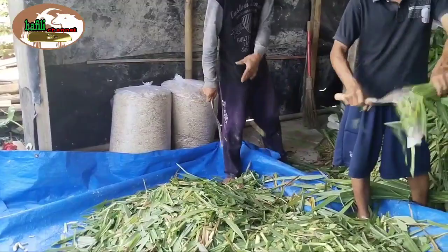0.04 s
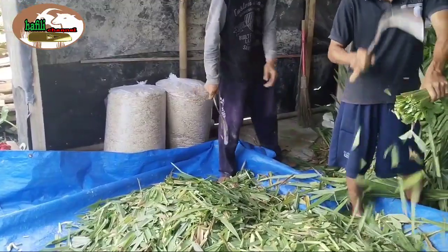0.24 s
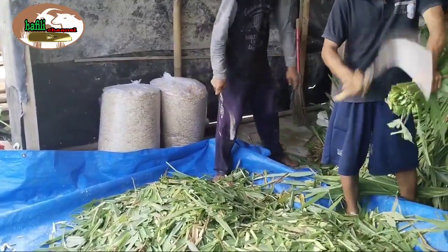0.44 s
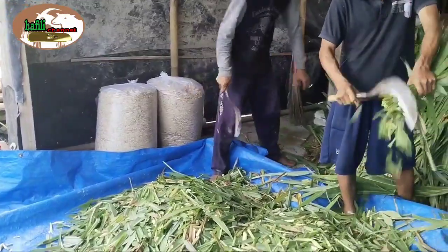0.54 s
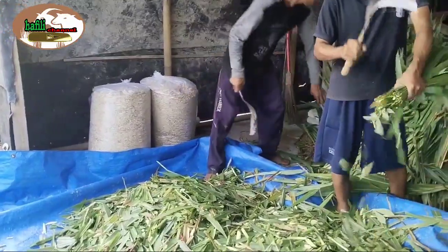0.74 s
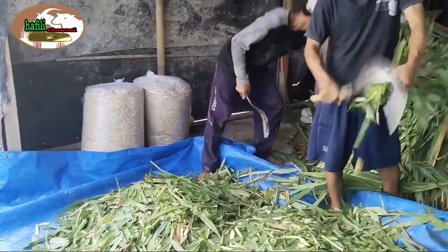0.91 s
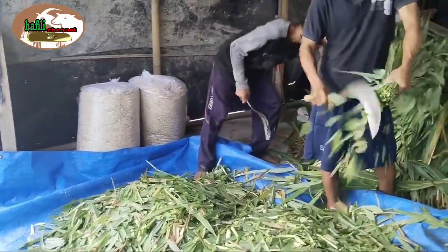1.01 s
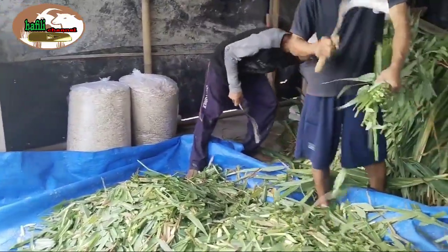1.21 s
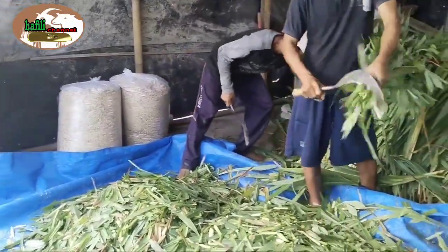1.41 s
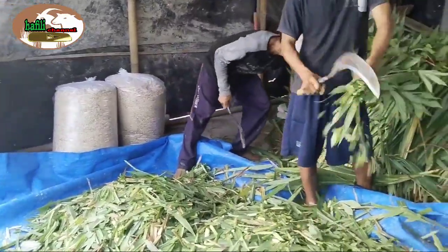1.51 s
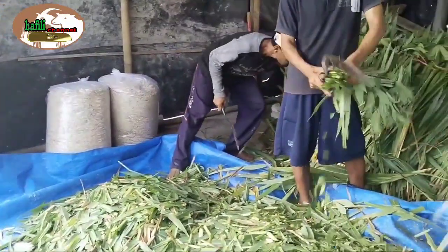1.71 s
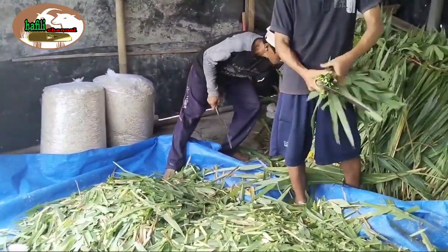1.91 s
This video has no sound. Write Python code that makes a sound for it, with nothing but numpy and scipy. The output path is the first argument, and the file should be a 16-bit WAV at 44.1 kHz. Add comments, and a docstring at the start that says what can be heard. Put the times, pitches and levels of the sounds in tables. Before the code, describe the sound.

A blade chops bundled green stalks four times, each a leafy swish then a crunchy knock.

```python
"""Outdoors, heard from close by: a low hum (filtered noise) and thin insect tones (wavering sines)
lie under a patter of leaves and small rustles made of crackling noise, as cuttings fall onto a heap.
Four strokes then cut the grass stalks. Each is a bright slice through the leaves, then a harder chop through
the stalks, both bursts of crackling noise; a dull knock and a ring of decaying sines go with the chop.
Late on, a third insect tone sounds briefly, and three soft low notes come and go in the hum."""
import sys
import numpy as np
from scipy import signal
from scipy.fft import rfft, irfft
from scipy.io import wavfile
from scipy.ndimage import uniform_filter1d

SR = 44100
rng = np.random.default_rng(int(sys.argv[2]) if len(sys.argv) > 2 else 0)


def file_out(sig):
    """Save sig as 16-bit WAV at sys.argv[1]."""
    # one column per channel
    cols = np.atleast_2d(sig).T
    # limit, then scale
    lim = np.clip(cols, -1, 1)
    pcm = np.round(lim * 32767).astype(np.int16)
    wavfile.write(sys.argv[1], SR, pcm)


N = 85995
OPEN_HZ = 10300  # source colours stay level above this

# Leaf colour, shared by patter and rustles. Each row: frequency in Hz, relative level in dB.
LEAF_COLOUR = [(180, -48), (300, -2), (333, -7), (434, -7), (667, -4.5), (1210, -6.5), (5530, -3.5),
               (6050, -7), (9020, 0.5), (10300, -5.5), (13400, -28), (22000, -120)]
# Blade through stalks. Each row: time of full level in seconds, level before the shelves in dB,
# rise in seconds, hold in seconds, 60 dB decay time in seconds, bass shelf in dB, treble shelf in dB,
# knock level in dB, knock bass shelf in dB, push on the ringing bundle in dB.
STALK_CHOPS = [(.3060, -11, 0.0025, 0.002, 0.11, -3, 3.5, -18, -1, -26),
               (0.7432, -13.5, 0.002, 0.0021, 0.14, 0, 5, -17, -4, -32.5),
               (1.2026, -15, .003, 0.003, 0.15, 3, 2.5, -14.5, -10, -31.5),
               (1.6293, -14, 0.0018, 0.0049, 0.13, -4.5, 2, -15.5, 6, -22.5)]


def undb(db):
    """Amplitude ratio of a level in dB."""
    return 10 ** (np.asarray(db) / 20)


def unit(x):
    """Signal scaled to an rms of 1."""
    return x / np.sqrt(np.mean(x ** 2))


def colour(x, tone, bass_db=0, treble_db=0, level_hz=np.inf):
    """Minimum-phase filter through (Hz, dB) points with two shelves; also returns its gain on white noise."""
    size, bass_hz, treble_hz = 4096, 915, 6700
    hz = np.maximum(np.arange(size // 2 + 1) * SR / size, 1)
    tone_hz, tone_db = np.array(tone, float).T
    db = np.interp(np.log(np.minimum(hz, level_hz)), np.log(tone_hz), tone_db)
    db = db + bass_db / (1 + (hz / bass_hz) ** 2)
    db = db + treble_db / (1 + (treble_hz / hz) ** 4)
    # Folding the cepstrum onto positive times makes the filter causal.
    cepstrum = irfft(np.log(undb(db)))
    cepstrum[1:size // 2] *= 2
    cepstrum[size // 2 + 1:] = 0
    response = irfft(np.exp(rfft(cepstrum)))
    filtered = signal.fftconvolve(x, response)[:len(x)]
    return filtered, np.sqrt(np.sum(response ** 2))


def toned(x, tone, *shelves_db):
    """Colour of a source, level above OPEN_HZ, scaled so that white noise would keep its level."""
    filtered, gain = colour(x, tone, *shelves_db, level_hz=OPEN_HZ)
    return filtered / gain


def walk(rate):
    """Random levels held 1 / rate s and slewed; spread near 1, never beyond 2 either way."""
    held = int(SR / rate)  # samples
    steps = np.repeat(rng.standard_normal(N // 8 + 2), held)[:N]
    return np.clip(unit(uniform_filter1d(steps, held)), -2, 2)


def crackle(spread_db):
    """Noise made of fibres snapping: dense short grains of uneven size, with a slower unevenness."""
    noise = rng.standard_normal(N)
    grains_db = spread_db * walk(1500)
    slow_db = 0.17 * spread_db * walk(250)
    return unit(noise * undb(grains_db + slow_db))


def bursts(rows, tone, spread_db):
    """Each row: a quick rise, a hold, an even decay (in dB) of crackling noise."""
    t, out, fibres = np.arange(N) / SR, 0, crackle(spread_db)
    rise_db = 29  # climbed during the rise time
    for at, db, rise, hold, t60, bass_db, treble_db, *_ in rows:
        rising_db = rise_db * np.minimum(t - at, 0) / rise
        falling_db = -60 * np.maximum(t - at - hold, 0) / t60
        level = undb(np.maximum(db + rising_db + falling_db, -200))
        out = out + toned(fibres * level, tone, bass_db, treble_db)
    return out


def hum():
    """Low outdoor noise, gently uneven in level, with a few soft sine notes that swell and fade."""
    # Colour of the low noise. Each row: frequency in Hz, relative level in dB.
    hum_colour = [(15, -35.5), (25, -12), (43, -14.5), (109, 1.5), (165, 0.5), (297, -5), (362, -26),
                  (600, -27.5), (780, -38), (1320, -120)]
    # Soft low notes. Each row: middle in seconds, frequency in Hz, peak level in dB,
    # length in seconds between the points at 1/e of the peak.
    low_notes = [(1.41, 331, -47, 0.038), (0.993, 283, -56.5, 0.17), (1.79, 172, -49, .06)]
    t = np.arange(N) / SR
    out = toned(rng.standard_normal(N), hum_colour) * undb(-57.5 + 0.5 * walk(7.57))
    for middle, hz, db, length in low_notes:
        swell = np.exp(-((t - middle) / (length / 2)) ** 2)
        out = out + undb(db) * swell * np.sin(2 * np.pi * hz * t)
    return out


def insects():
    """Thin sines that waver in pitch and level, with short fades at their ends."""
    # Insect tones. Each row: start in seconds, end in seconds, mean frequency in Hz,
    # middle level in dB, spread of the level in dB.
    insect_tones = [(0, 1.95, 5432, -60, 2.0), (0, 1.95, 5516, -63, 2.0), (1.243, 1.41, 5692, -45, 1.0)]
    t, out, fade_s = np.arange(N) / SR, 0, 0.0088
    for start, end, hz, db, waver_db in insect_tones:
        sounding = 1. * ((t >= start) & (t <= end))
        gate = uniform_filter1d(sounding, int(fade_s * SR), mode="nearest")
        pitch = hz * (1 + .0006 * walk(60))
        level = undb(db + waver_db * walk(90))
        out = out + gate * level * np.sin(2 * np.pi * np.cumsum(pitch) / SR)
    return out


def leaves():
    """A flickering patter of falling cuttings and moving leaves: crackling noise on a drawn level."""
    # Level of the patter. Each row: time in seconds, level in dB.
    patter_level = [(0, -43.5), (.06, -47), (.2, -46.5), (.3, -40.5), (0.358, -35), (.45, -38),
                    (0.601, -47.5), (.72, -37.5), (0.822, -40), (.9, -47), (.97, -42), (1.07, -50.5),
                    (1.19, -43.5), (1.27, -39.5), (1.4, -43.5), (1.502, -50), (1.62, -32), (1.721, -39),
                    (1.81, -46.5), (1.95, -42)]
    t = np.arange(N) / SR
    at, db = np.array(patter_level).T
    flicker_db = 0.64 * walk(40.16)
    return toned(crackle(2.16) * undb(np.interp(t, at, db) + flicker_db), LEAF_COLOUR)


def rustles():
    """Small separate leaf rustles: faint bursts of uneven crackling."""
    # Leaf rustles. Each row: time of full level in seconds, level before the shelves in dB, rise in seconds,
    # hold in seconds, 60 dB decay time in seconds, bass shelf in dB, treble shelf in dB.
    leaf_rustles = [(.092, -44.5, .004, 0.014, 0.12, -5, -4.5), (.117, -42.5, .004, 0.0062, 0.12, 11.5, -1),
                    (.147, -43, .004, .006, 0.067, -3, -3), (.178, -38.5, .004, 0.014, 0.11, -6, 0),
                    (.640, -42.5, 0.059, 0.0059, 0.07, 8, -6), (.925, -36, .004, 0.0026, 0.059, 3, 8),
                    (.956, -36, 0.01, 0.0055, 0.11, -4, 3), (1.032, -46, 0.0033, 0.0042, 0.046, -6, -6),
                    (1.15, -41.5, .01, 0.012, .12, 14, -4), (1.32, -38.5, 0.008, 0.0092, 0.099, 4, 7),
                    (1.39, -43, 0.031, 0.0062, 0.042, 3, 0), (1.538, -54, .004, 0.011, .1, 28, -13),
                    (1.556, -56, .003, 0.0044, .1, 4, 2)]
    return bursts(leaf_rustles, LEAF_COLOUR, 2.5)


def slices():
    """The blade through the leaves: bright bursts of fine, even crackling."""
    # Slices. Each row: time of full level in seconds, level before the shelves in dB, rise in seconds,
    # hold in seconds, 60 dB decay time in seconds, bass shelf in dB, treble shelf in dB.
    leaf_slices = [(.210, -17.5, 0.0078, 0.0046, 0.13, -0.5, -1.5),
                   (.658, -19, 0.01, 0.0086, 0.13, -2.5, -2.5), (1.104, -19.5, .012, 0.008, .14, -2, -1.5),
                   (1.572, -22, 0.018, 0.011, 0.12, -3, -2)]
    # Colour of a slice. Each row: frequency in Hz, relative level in dB.
    slice_colour = [(90, -37), (150, -15), (400, -15.5), (750, -12.5), (1000, -7.5), (2590, -5.5),
                    (3300, -8.5), (5170, -3.5), (6100, -11.5), (6900, 0), (7700, -12), (9200, 2.5),
                    (10300, -8.5)]
    return bursts(leaf_slices, slice_colour, 0.5)


def chops():
    """The blade through the stalks: harder bursts with a faster rise and coarser crackling."""
    # Colour of a chop. Each row: frequency in Hz, relative level in dB.
    chop_colour = [(90, -44.5), (150, -18), (300, -9), (600, -3), (1200, -6.5), (1950, -4), (3500, -6),
                   (4400, -4), (5170, -4), (6200, -9), (7760, -10), (9200, -4), (10300, -11.5)]
    return bursts(STALK_CHOPS, chop_colour, 1.6)


def knocks():
    """The few ms in which the blade parts the stalks: a dull crack, and a push that rings the bundle."""
    # Colour of the crack. Each row: frequency in Hz, relative level in dB.
    knock_colour = [(100, -46), (180, -11.5), (300, 10), (600, -6.5), (1000, 19), (1800, 15), (2600, 11.5),
                    (4000, -4), (8000, -22)]
    # Hollow ring of the stalk bundle. Each row: frequency in Hz, relative level in dB,
    # 60 dB decay time in seconds.
    bundle_modes = [(538, -4.5, 0.11), (570, 3, 0.077), (633, 2, 0.12), (682, 4.5, .05)]
    width_s, lag_s = 0.0051, 0.00252  # width between 1/e points, lag behind the chop
    t, noise = np.arange(N) / SR, rng.standard_normal(N)
    blow, push, ring = 0, np.zeros(N), 0
    for at, *_, knock_db, bass_db, push_db in STALK_CHOPS:
        env = np.exp(-((t - at - lag_s) / (width_s / 2)) ** 2)
        crack = toned(env * noise, knock_colour, bass_db)
        # Each crack is given the energy of its envelope, so chance does not set its level.
        even = np.sqrt(np.sum(env ** 2) / np.sum(crack ** 2))
        blow = blow + undb(knock_db) * crack * even
        push[int((at + lag_s) * SR)] = undb(push_db)
    for hz, db, t60 in bundle_modes:
        pole = np.exp(2j * np.pi * hz / SR - np.log(1000) / (t60 * SR))
        ring = ring + undb(db) * signal.lfilter([1], [1, -pole], push).imag
    return blow + toned(ring, [(150, -29), (450, 0.5)])  # (Hz, dB): thinner bass


def scene():
    """Hum, insects and leaves throughout, with the rustles and the four strokes on top."""
    place = hum() + insects() + leaves() + rustles()
    strokes = slices() + chops() + knocks()
    return (place + strokes)[None]


def record(dry):
    """The loudest peaks are rounded, and most of the top octave is filtered out."""
    # Overall tone: dull above 10.5 kHz, with a faint band at 13-15 kHz.
    # Each row: frequency in Hz, gain in dB.
    overall_tone = [(10200, 1.5), (10750, -11.5), (10950, -26), (11500, -43.5), (12600, -44), (13200, -28),
                    (15200, -26), (15900, -59)]
    limit, top_hz = .9, 16473  # full-scale fraction, steep upper edge
    rounded = limit * np.tanh(dry[0] / limit)
    heard, _ = colour(rounded, overall_tone)
    low_pass = signal.ellip(8, .2, 70, top_hz, fs=SR, output="sos")
    return signal.sosfilt(low_pass, heard[None])


dry = scene()
out = record(dry)
file_out(out)
```